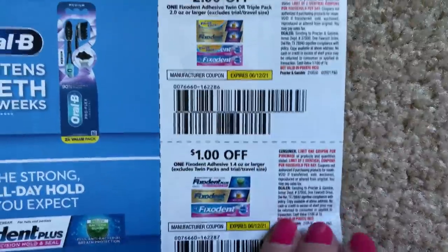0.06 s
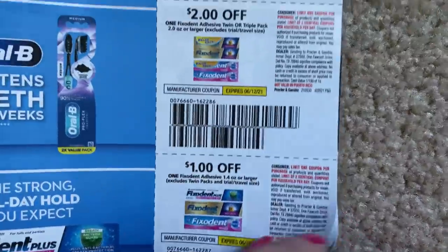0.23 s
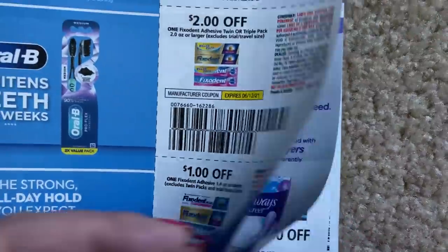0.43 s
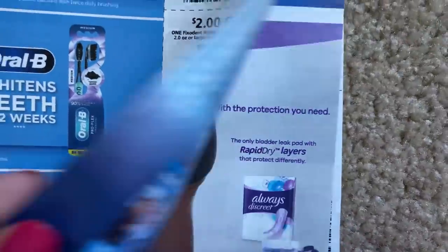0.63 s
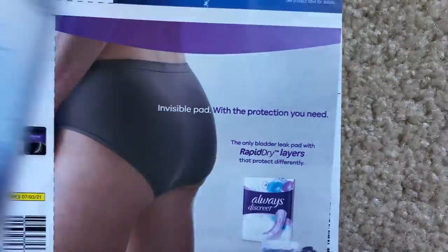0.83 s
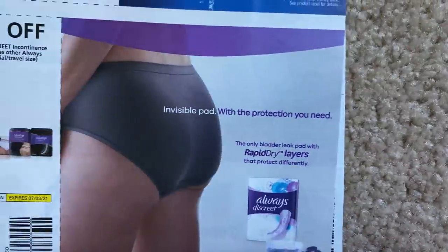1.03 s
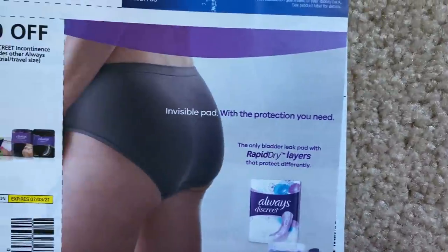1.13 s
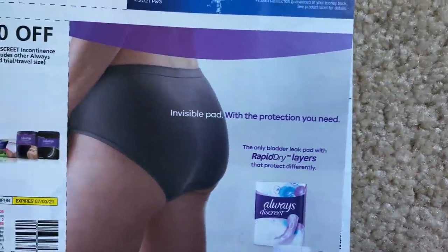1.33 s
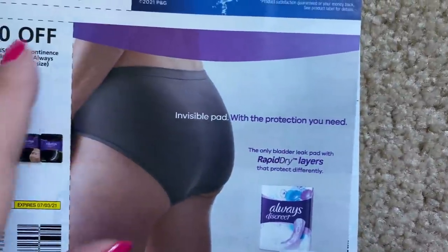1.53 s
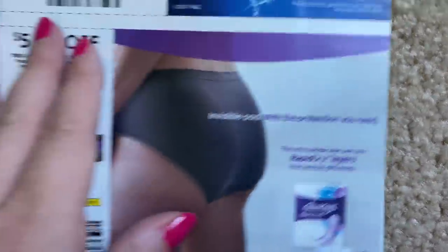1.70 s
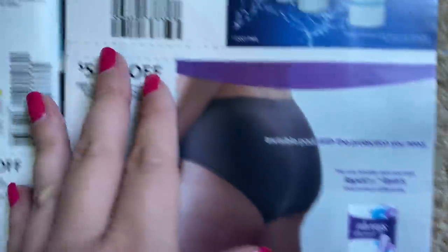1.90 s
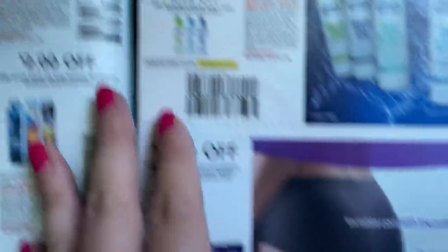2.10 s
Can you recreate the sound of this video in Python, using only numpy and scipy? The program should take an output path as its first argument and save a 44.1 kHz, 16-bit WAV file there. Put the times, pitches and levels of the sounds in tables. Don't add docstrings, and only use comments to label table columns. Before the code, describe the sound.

Glossy paper page turned by hand: soft sliding and crisp crease ticks, then a loud wobbling flap, a quiet lull, and a pat with faint sliding, heard close in stereo in a quiet carpeted room.

```python
import sys
import numpy as np
from scipy import signal
from scipy.fft import rfft, irfft, next_fast_len
from scipy.io import wavfile

SR = 44100
rng = np.random.default_rng(int(sys.argv[2]) if len(sys.argv) > 2 else 0)


def store_pcm(level_fs):
    pcm = np.round(np.clip(level_fs, -1, 1) * 32767).astype(np.int16)
    wavfile.write(sys.argv[1], SR, np.atleast_2d(pcm).T)


def rack_gain(trim_db):
    fader = np.asarray(trim_db, float)
    return 10 ** (fader / 20)


N = 94815


def at_hz(points, hz):
    freqs, values = np.array(points)[:, 0], np.array(points)[:, 1]
    return np.interp(np.log(hz), np.log(freqs), values)


def drift(rate):
    r = np.exp(-40 * np.pi * rate / SR)
    slow = signal.lfilter([1], [1, -2 * r, r * r], rng.standard_normal(N // 20 + 2002))[2000:]
    return np.interp(np.arange(N) / 20, np.arange(len(slow)), slow / slow.std())


def coloured(points, low_hz):
    hz = np.fft.rfftfreq(N, 1 / SR) + 1
    spectrum = rfft(rng.standard_normal((2, N))) * rack_gain(at_hz(points, hz))
    x = irfft(spectrum / (1 + (low_hz / hz) ** 4), N)
    return x / x.std()


def room_rumble():
    # (time [s], level [dB])
    swell = [
        (.05, -55.5),
        (0.401, -51.5),
        (.7, -51.5),
        (1.0, -47),
        (1.5, -49.5),
        (2.15, -59),
    ]
    # (frequency [Hz], level per Hz [dB])
    spectrum = [(15, -32), (30, -4), (61, 7), (172, -2.5), (210, -8.5), (274, -1.5), (600, -29.5),
                (780, -54), (1320, -120)]
    level_db = np.interp(np.arange(N) / SR, *np.transpose(swell)) + 1.24 * drift(2.6)
    return rack_gain(level_db) * coloured(spectrum + [(900, -57)], low_hz=24.4)


def hiss():
    # (frequency [Hz], level [dB])
    spectrum = [(300, -9.5), (1000, 1), (4000, -4.5), (8000, -5), (10000, -12.5), (16000, -8)]
    return rack_gain(-56.5) * coloured(spectrum, low_hz=250)


def strokes(rows, t):
    start, length, db, _ = np.transpose(rows)[:, :, None]
    rise_s = .0015 + .1 * length
    fall_s = 0.0027 + 0.33 * length
    rise = 1 - np.exp(-np.clip(t - start, 0, None) / rise_s)
    fall = np.exp(-np.clip(t - start - 0.79 * length, 0, None) / fall_s)
    return (rack_gain(db) * rise * fall) ** 2


def friction(patchy_db, flicker_db):
    # (start [s], length [s], level [dB], centre [Hz])
    slides = [(-.05, 0.06, -53.5, 8450), (.0, 0.048, -56, 8000), (.09, 0.022, -58, 5000),
              (0.115, 0.026, -50.5, 5170), (0.137, .08, -50, 5550), (0.182, 0.19, -44, 5370),
              (0.351, 0.0081, -45, 12000), (0.353, 0.029, -39.5, 7200), (0.376, 0.11, -47, 6060),
              (0.443, 0.034, -42.5, 6900), (0.47, 0.09, -45, 5640), (0.566, 0.008, -42.5, 6000),
              (0.572, 0.0099, -41.5, 7040), (0.603, 0.11, -42.5, 8200), (0.62, 0.062, -44, 6050),
              (0.684, 0.071, -47, 7200), (0.801, 0.025, -48.5, 6470), (0.84, 0.022, -42, 4600),
              (0.879, 0.029, -50, 4770), (0.941, 0.012, -50, 8000), (0.894, 0.018, -46, 4950),
              (0.963, 0.0033, -37, 4470), (0.992, 0.075, -47.5, 5960), (0.969, 0.014, -53, 3500),
              (1.091, 0.12, -49, 8850), (1.332, 0.032, -52, 7770), (1.363, 0.044, -55.5, 7000),
              (1.403, 0.052, -52.5, 6060), (1.437, 0.23, -59.5, 7000), (1.678, 0.15, -55, 6700),
              (1.73, 0.14, -52.5, 7350), (1.953, 0.071, -57, 7200), (2.012, 0.14, -63, 6300)]
    # (start [s], length [s], level [dB], centre [Hz])
    rustles = [(0.056, 0.02, -60, 686), (0.074, 0.38, -56.5, 1330), (0.368, 0.028, -47.5, 786),
               (0.451, 0.094, -50.5, 726), (0.593, 0.012, -55, 1000), (0.658, 0.11, -48, 1630),
               (0.781, 0.087, -46.5, 1030), (0.887, 0.15, -40, 1120), (1.089, 0.11, -47, 1310),
               (1.214, 0.047, -38.5, 1060), (1.238, 0.08, -48, 910), (1.398, 0.056, -48.5, 1140),
               (1.669, 0.042, -53.5, 2600), (1.756, 0.0098, -41.5, 1210), (1.773, 0.04, -41, 880),
               (1.818, 0.092, -59, 760), (1.96, 0.049, -54, 1130)]
    # (start [s], length [s], level [dB], centre [Hz])
    squeaks = [(0.44, 0.0082, -42, 14400), (0.55, 0.069, -53.5, 3060), (0.98, 0.0059, -38, 4100),
               (0.95, 0.22, -51.5, 2500), (1.213, 0.017, -46, 2750), (0.017, 0.098, -53, 132),
               (0.46, 0.64, -51.5, 87), (0.857, 0.13, -44, 95), (1.03, 0.11, -46, 71), (1.97, .05, -52, 58),
               (1.5, 0.061, -51, 93), (.749, .018, -40, 200), (.577, 0.0055, -43, 4900),
               (.64, 0.053, -53, 2950), (1.225, 0.033, -41.5, 970), (1.08, 0.13, -55.5, 2600),
               (1.41, 0.068, -60, 2600)]
    # (frequency [Hz], level [dB])
    paper = [(200, 5.5), (900, 5.5), (1900, 5.5), (2700, 6.5), (3600, 8.5), (8300, 12), (9600, 11.5),
             (15500, 4.5)]
    kinds = [slides, rustles, squeaks]
    octaves = [1.7, 1.007, .3]
    grains_per_s, grain_spread_db = 12000, 1.8

    coarse = np.arange(0, N + 32, 32)
    power = np.vstack([strokes(rows, coarse / SR) for rows in kinds])
    centre = np.array([row[3] for row in slides + rustles + squeaks])
    width = np.repeat(octaves, [len(rows) for rows in kinds])

    size = rack_gain(grain_spread_db * np.minimum(rng.exponential(1, (2, N)), 5))
    size = size * (rng.random((2, N)) < grains_per_s / SR)
    grains = size[:, None] * rng.standard_normal((2, 2, N))
    grains = grains / grains.std()

    edges = 50 * 2 ** np.arange(0, 8.5, 1 / 3)
    together = drift(24.0)
    out = 0
    for k, (low, high) in enumerate(zip(edges, edges[1:])):
        hz = np.sqrt(low * high)
        bandpass = signal.butter(2, [low, high], "band", fs=SR, output="sos")
        band = signal.sosfilt(bandpass, grains[k % 2])
        share = np.exp(-(np.log2(hz / centre) / width) ** 2) / (12.7 * width)
        level = np.interp(np.arange(N), coarse, np.sqrt(share @ power))
        gain_db = at_hz(paper, hz) + patchy_db * drift(30.0) + flicker_db * together
        out = out + band / band.std() * level * rack_gain(gain_db)
    return out


def ticks():
    # (time [s], peak level [dB], ring [Hz], length [s], top of the crack [Hz])
    creases = [(0.0626, -37.5, 774, 0.0018, 1530), (.2868, -17, 4200, 0.0023, 10700),
               (0.3728, -26, 7000, 0.0014, 11000), (0.3732, -21, 7700, .0015, 11000),
               (0.383, -18.5, 4600, 0.0026, 8950), (0.4637, -31, 7550, .002, 9900),
               (0.4652, -15.5, 5440, 0.0023, 9100), (0.5664, -23, 8140, 0.0019, 9000),
               (.5678, -27, 4560, .001, 9000), (.5735, -31, 8200, .0015, 9000),
               (.5775, -27, 4600, .003, 5000), (.5815, -28, 4500, .0015, 5000),
               (0.5845, -29, 4340, 0.00087, 5000), (0.5987, -26, 1910, 0.0014, 4000),
               (.7468, -28.5, 3370, 0.00078, 9000), (0.786, -34, 4300, .001, 9000),
               (.7965, -37, 2500, .001, 5000), (.8056, -24, 4000, .0006, 8500),
               (.841, -26, 2500, .0008, 8500), (.8941, -21, 2700, .001, 13000),
               (.9228, -26, 700, .0015, 1300), (.942, -21, 2500, .0007, 13000),
               (.9612, -17, 7500, .001, 14000), (.9628, -16, 2900, .0018, 6000),
               (.992, -20, 2600, .0008, 13000), (1.0275, -26, 2700, .0015, 5000),
               (1.0298, -24, 6000, .001, 9000), (1.2345, -36, 1000, .002, 7000),
               (1.4084, -28, 2870, 0.00089, 10100), (1.7596, -38, 955, 0.0024, 3020),
               (1.7617, -34, 2600, .001, 4000), (1.7724, -14, 2640, 0.0012, 7200),
               (1.7726, -19, 965, 0.00087, 1520)]
    ring_cycles, rise_s = 11, .0003
    first_slip = 3
    ring_db, crack_db = 2.5, -2.5
    crack_span = 3.7

    out, t = np.zeros((2, N + 600)), np.arange(600) / SR
    all_slips = rng.standard_normal((len(creases), 2, 600))
    for (s, db, hz, length, top), slips in zip(creases, all_slips):
        burst = slips * np.minimum(t / rise_s, 1) + first_slip * (t == t[12])
        burst = burst * np.exp(-(t / length) ** 2)
        r, w = rack_gain(-60 * hz / ring_cycles / SR), 2 * np.pi * hz / SR
        ring = signal.lfilter([1, 0, -1], [1, -2 * r * np.cos(w), r * r], burst)
        highpass = signal.butter(2, hz / crack_span, "high", fs=SR, output="sos")
        crack = signal.sosfilt(highpass, burst)
        dull = signal.butter(4, np.clip(top, hz, 15000), fs=SR, output="sos")
        ring, crack = signal.sosfilt(dull, ring), signal.sosfilt(dull, crack)
        tick = rack_gain(ring_db) * ring / ring.std() + rack_gain(crack_db) * crack / crack.std()
        i = int(s * SR)
        out[:, i:i + 600] += rack_gain(db) * tick / np.abs(tick).max(axis=1, keepdims=True)
    return out[:, :N]


def buckles():
    # (time [s], level [dB], cycles per e-fold of time [1], negative for the other way)
    snaps = [(0.0628, -47, -1.5), (0.6004, -37, -0.995), (0.6974, -38.5, 0.9), (0.7472, -40.5, 1.0),
             (0.7743, -38, 0.82), (0.7962, -35.5, -1.35), (0.8062, -26.5, -0.95), (0.8254, -28.5, 0.89),
             (0.8408, -33, 1.3), (0.8951, -23.5, 0.96), (0.9237, -24.5, 0.9), (0.9429, -22.5, 0.88),
             (0.9618, -19, -1.22), (0.9931, -20.2, 0.95), (1.006, -29.5, 0.98), (1.0305, -26, -1.057),
             (1.047, -32, 0.9), (1.066, -41, 1.0), (1.105, -42.6, 0.9), (1.1247, -35, -0.95),
             (1.2468, -40, -1.48), (1.4086, -50, 1.2), (1.7607, -37.5, 1.05)]
    start_s, rise_s, decay_s = .0008, .001, .015
    floor_hz = 4.4
    edge_s, edge_db = 0.01197, -14

    out, t = np.zeros(N + 9000), np.arange(6000) / SR
    envelope = (1 - np.exp(-t / rise_s)) * np.exp(-t / decay_s)
    chances = rng.uniform(0.615, 1.405, (len(snaps), 2))
    for (s, db, cycles), chance in zip(snaps, chances):
        direct = (0, 0, 1)
        returned = (edge_s * chance[0], edge_db, 1.3 * chance[1])
        for lag, loss_db, stretch in [direct, returned]:
            turns = stretch * abs(cycles) * np.log(1 + t / start_s) + floor_hz * t
            wave = np.sign(cycles) * np.sin(2 * np.pi * turns)
            i = int((s + lag) * SR)
            out[i:i + 6000] += rack_gain(db + loss_db) * wave * envelope
    wobbling = out[:N] * rack_gain(1.0 * drift(107))
    return signal.sosfilt(signal.butter(3, 45, "high", fs=SR, output="sos"), wobbling)


def room(x):
    t60_s = 0.1
    t = np.arange(SR // 4) / SR
    tail = signal.lfilter([.4], [1, -.6], rng.standard_normal((2, len(t))))
    tail = tail * rack_gain(-60 * t / t60_s) * (t > .003)
    tail = tail / np.sqrt((tail ** 2).sum(axis=1, keepdims=True))
    return signal.fftconvolve(x, tail, axes=1)[:, :N]


def scene():
    background = room_rumble() + hiss()
    rubbing = friction(patchy_db=1.6, flicker_db=0.36)
    hits = ticks() + buckles() * [[1], [.3]]
    return background + rubbing + hits + rack_gain(-21) * room(hits)


def ports(near, far, hz, half_turn_hz, wraps, scatter):
    # (frequency [Hz], level difference [dB])
    left_db = [(300, -8.5), (800, 7.5), (1500, -0.5), (2700, -3), (3800, 5), (5500, 6), (8200, -8),
               (10000, -1)]
    # (frequency [Hz], share [1])
    diffuse = [(60, 0.35), (450, 0.57), (1450, 0.45), (3350, 0.69), (4100, 1), (6300, 0.78), (7700, 1),
               (10300, 0.025)]
    likeness = .99

    low_turn = .19 * np.exp(-(np.log2(hz / 700) / 0.55) ** 2)
    climbing = .5 * (hz / half_turn_hz) ** 1.36 + (1 - wraps) * low_turn
    falling = (10995 - hz) * 0.00025 - wraps
    turn = np.pi * np.minimum(climbing, falling)

    spread = np.clip(scatter * at_hz(diffuse, hz), 0, 1)
    straight = np.sqrt(1 - spread ** 2)
    scattered = spread * far / np.sqrt(2)
    twin = np.where(hz > 9500, likeness * near + np.sqrt(1 - likeness ** 2) * far, near)
    mid = straight * np.cos(turn) * near + scattered
    side = straight * 1j * np.sin(turn) * twin + scattered * np.exp(-2j * np.pi * hz * .002)

    bass = hz ** 2 / (hz ** 2 + 312 ** 2)
    tilt_db = bass * at_hz(left_db, hz) / scatter ** 2
    return np.array([mid + side, mid - side]) * rack_gain(tilt_db * [[.5], [-.5]])


def low_pass(x):
    return signal.sosfilt(signal.butter(12, 16960, fs=SR, output="sos"), x)


def record(dry):
    turned_s, crossing_s = .595, 0.039
    size = next_fast_len(N + 2048)
    hz = np.fft.rfftfreq(size, 1 / SR) + 1
    near, far = rfft(dry, size)
    carpet = 1 - 0.28 * np.exp(-((hz - 3370) / 154) ** 2)
    early = ports(near, far, hz, half_turn_hz=2750, wraps=0.98, scatter=1.19)
    late = ports(near, far, hz, half_turn_hz=1500, wraps=0, scatter=0.92) * carpet
    early, late = irfft(early, size)[:, :N], irfft(late, size)[:, :N]
    angle = np.pi / 2 * np.clip((np.arange(N) / SR - turned_s) / crossing_s + .5, 0, 1)
    mix = np.cos(angle) * early + np.sin(angle) * late
    top_cut = signal.cheby2(8, 40, 16550, fs=SR, output="sos")
    return low_pass(signal.sosfilt(top_cut, mix))


dry = scene()
out = record(dry)
store_pcm(out)
```